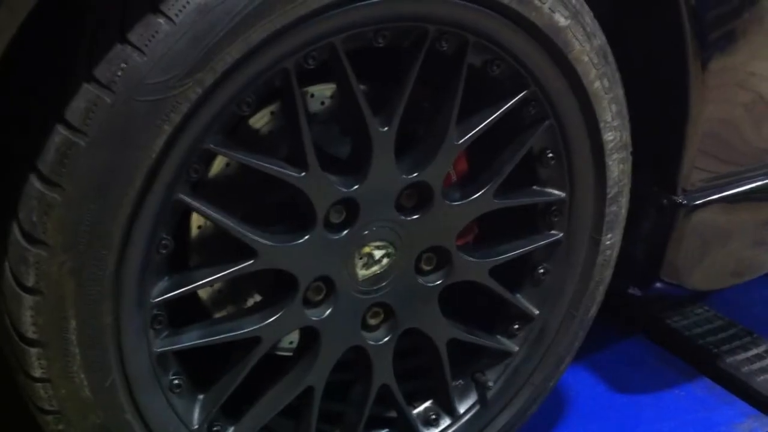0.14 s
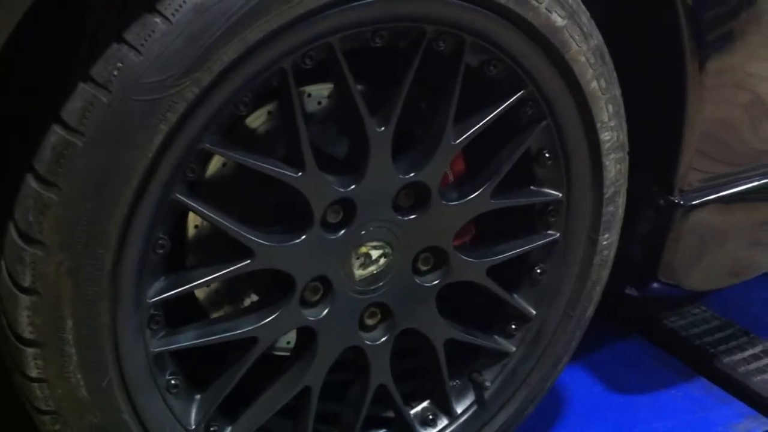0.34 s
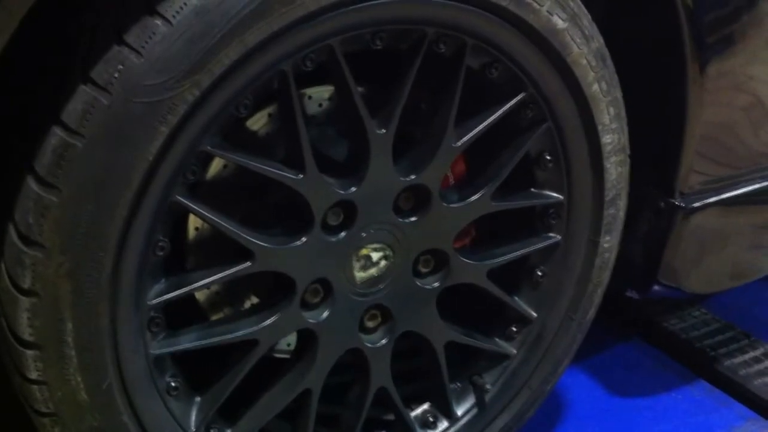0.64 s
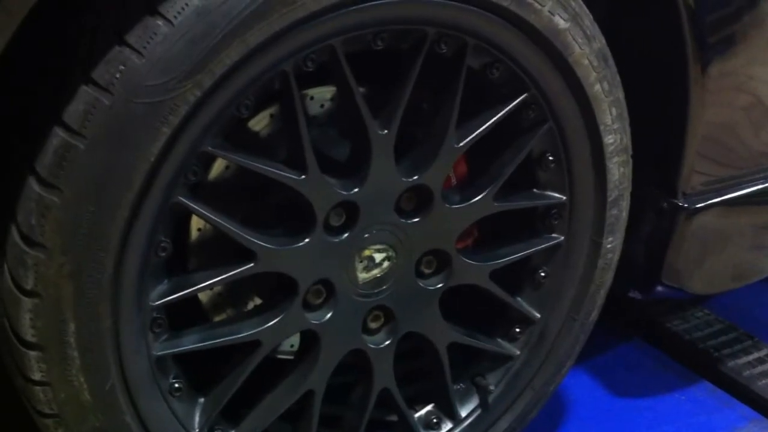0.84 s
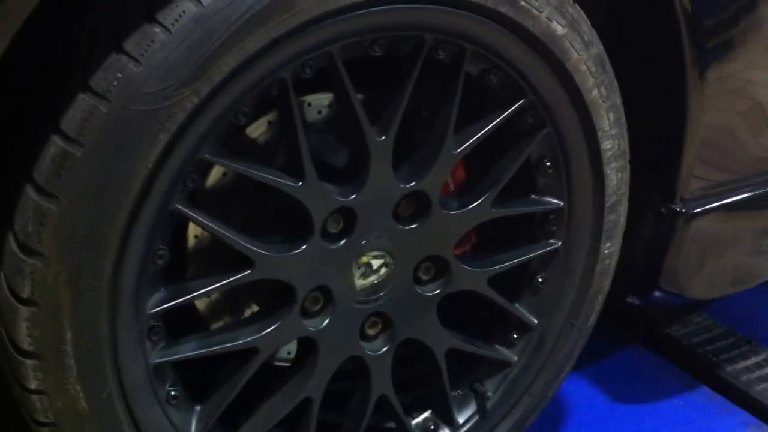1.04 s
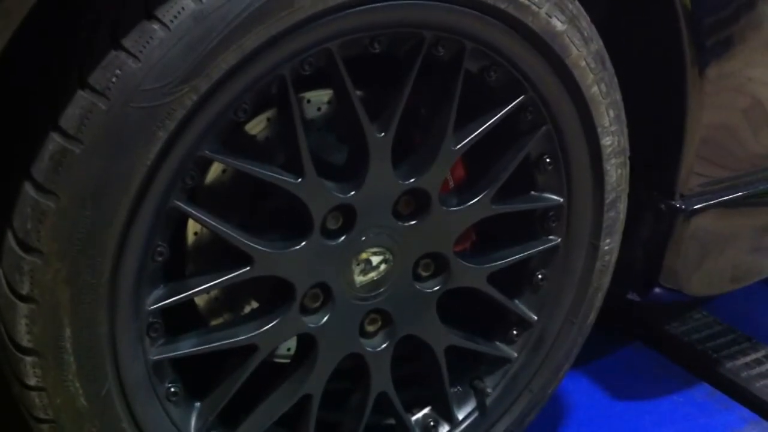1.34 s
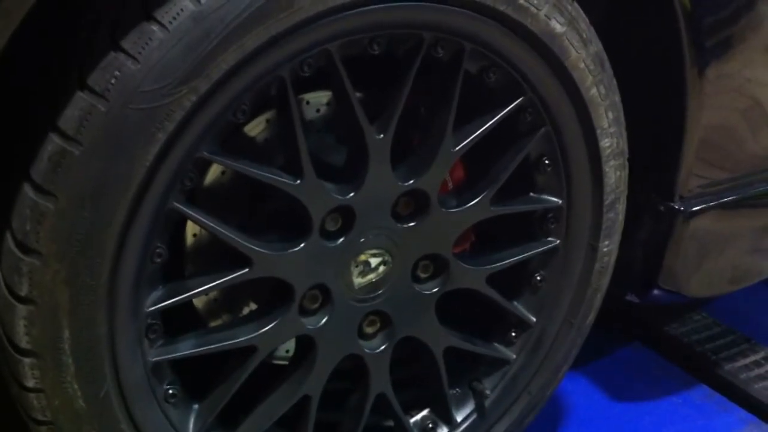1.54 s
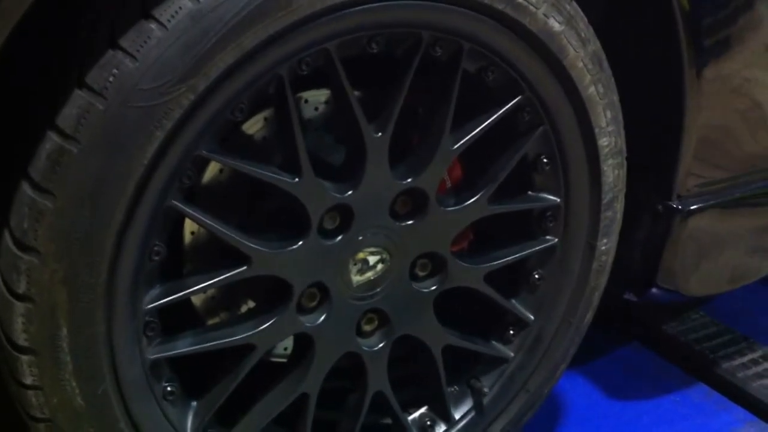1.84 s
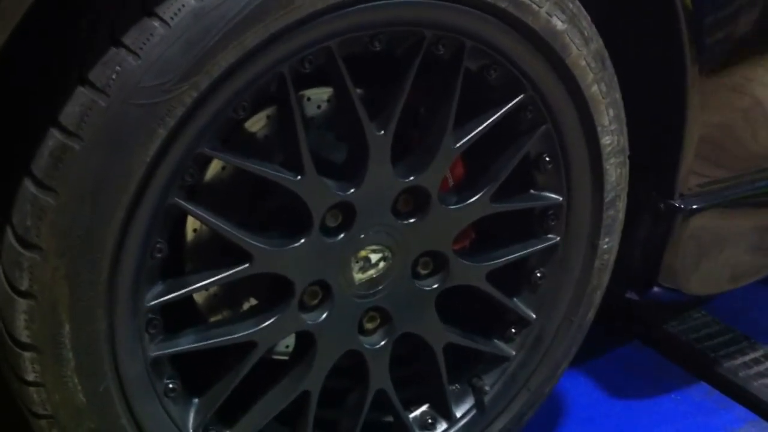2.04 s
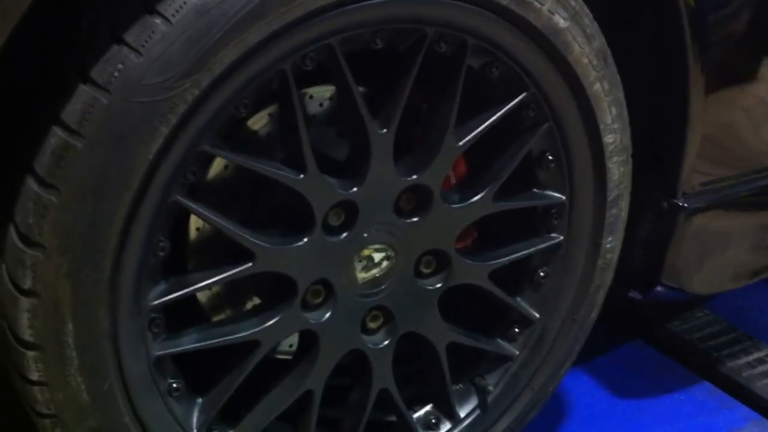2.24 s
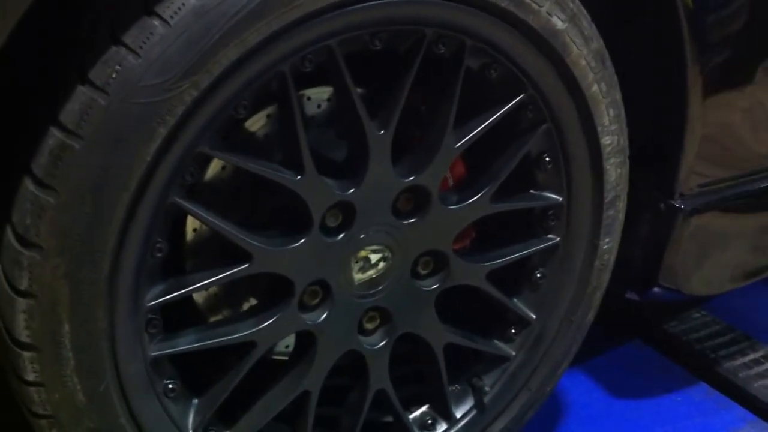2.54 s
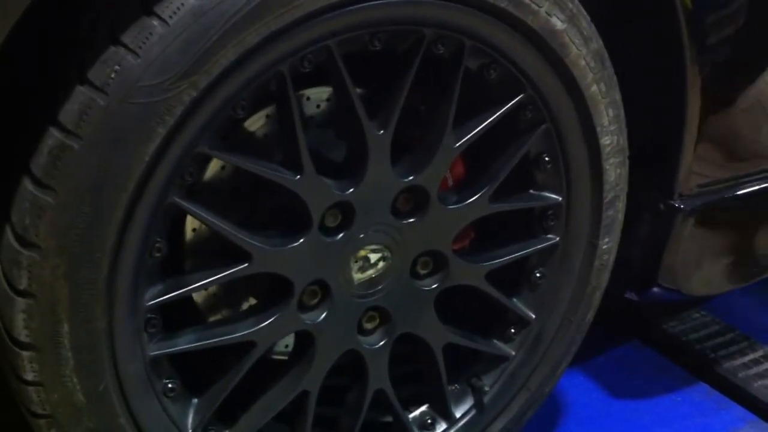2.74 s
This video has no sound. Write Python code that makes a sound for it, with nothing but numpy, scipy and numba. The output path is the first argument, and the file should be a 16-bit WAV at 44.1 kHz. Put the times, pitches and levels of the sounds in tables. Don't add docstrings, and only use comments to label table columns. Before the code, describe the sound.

A car engine idles throughout, heard close in mono in a garage with a short echo. A low, slightly uneven exhaust drone booms beneath bright metallic valve taps, one loud tap recurring between six and seven times a second with weaker ones between. Chain whirr, faint belt whine and fan hiss fill the middle. After 1 s the boom surges and the idle quickens slightly; near 2.3 s something loose rattles once.

```python
import sys
import numpy as np
from scipy import signal
from scipy.io import wavfile
from scipy.ndimage import uniform_filter1d
from numba import njit

SR = 44100
rng = np.random.default_rng(int(sys.argv[2]) if len(sys.argv) > 2 else 0)


def wav_record(signal):
    frames = np.transpose(np.atleast_2d(signal))
    bounded = np.clip(frames, -1, 1)
    quanta = np.round(bounded * 32767).astype(np.int16)
    wavfile.write(sys.argv[1], SR, quanta)


def gain_from_db(level_db):
    decades = np.asarray(level_db, float) / 20
    return 10 ** decades


N = 127008


def level(x, db):
    return x * gain_from_db(db) / np.sqrt(np.mean(x ** 2))


def noise():
    return rng.standard_normal(N)


@njit
def svf(x, hz, width):
    y, band, low = np.empty(len(x)), 0., 0.
    g, damping = np.tan(np.pi * hz / SR), width / hz
    for i in range(len(x)):
        v = (band + g * (x[i] - low)) / (1 + g * (g + damping))
        band, low, y[i] = 2 * v - band, low + 2 * g * v, damping * v
    return y


def ring(x, modes):
    out = 0
    for k, (hz, width, db) in enumerate(modes):
        out = out + (-1) ** k * gain_from_db(db) * svf(x, 1. * hz, 1. * width)
    return out


def walk(rate):
    hold = int(SR / rate)
    steps = np.repeat(rng.standard_normal(N // hold + 1), hold)
    return 1.85 * uniform_filter1d(uniform_filter1d(steps, hold), hold)[:N]


def convolve(x, shape):
    return signal.fftconvolve(x, shape)[:N]


def strikes(turns, deg, jitter_deg, scatter_db):
    chance = rng.standard_normal((24, 2))
    at = np.arange(24) - 1 + (deg + jitter_deg * chance[:, 0]) / 720
    keep = (at > 0) & (at < turns[-1])
    out = np.zeros(N)
    out[np.searchsorted(turns, at[keep])] = gain_from_db(scatter_db * chance[keep, 1])
    return out


# time in seconds, crank speed in rpm.
SPEED = [(0.0, 786.2), (0.19, 783.5), (0.38, 778.7), (0.58, 787.6), (0.77, 776.9), (0.96, 795.9),
         (1.15, 783.1), (1.34, 800.2), (1.54, 777.7), (1.73, 812.1), (1.92, 789.3), (2.11, 817.2),
         (2.3, 803.4), (2.5, 801.9), (2.69, 811.4), (2.88, 796.3)]


def crank_rpm():
    speed = np.array(SPEED)
    return np.interp(np.arange(N) / SR, speed[:, 0], speed[:, 1])


CYLINDERS = [-5.5, -1, -6, -1.5, -6.5, 0.5]


def cylinder_firings(turns):
    first_deg, jitter_deg, scatter_db = 18, 1.5, .8
    out = 0
    for k, db in enumerate(CYLINDERS):
        deg = first_deg + 720 * k / len(CYLINDERS)
        out = out + gain_from_db(db) * strikes(turns, deg, jitter_deg, scatter_db)
    return out


# time in seconds, level in dB.
BOOM = [(0.0, -12), (0.02, -11.5), (0.74, -10.5), (0.76, -11.5), (1.07, -8.5), (1.19, -12), (1.26, -8),
        (1.4, -9.5), (1.48, -10), (1.84, -9.5), (1.94, -10), (2.28, -7), (2.35, -10), (2.85, -7),
        (2.88, -8)]
# frequency in Hz, width in Hz, level in dB.
PIPE = [(156.4, 16.5, 1.5), (83.5, 11, -7), (60.5, 8, -12), (280.5, 22.3, -3), (101, 9.6, -4.5),
        (139.8, 10, 2.5), (40, 15, -31), (199, 27, -8), (354, 50, -8), (446, 130, -21.5)]


def exhaust(turns, firings):
    order, lead_deg = 18, 3.6
    t, curve = np.arange(N) / SR, np.array(BOOM)
    boom_db = np.interp(t, curve[:, 0], curve[:, 1]) + 0.29 * walk(9.23)
    boom = np.sqrt(2) * gain_from_db(boom_db) * np.sin(2 * np.pi * order * (turns + lead_deg / 720))
    pipe = level(ring(firings, PIPE), -20)
    rumble = level(svf(noise(), 187.0, 204.0), -24.5)
    return boom + pipe + rumble


# angle in degrees of the 720 cycle, then low, middle, high and top band levels in dB.
TAPS = [(326.6, -24, -26.5, -27, -30), (106, -32.5, -37.5, -34.5, -42), (126.9, -41, -35, -36.5, -30.5),
        (595, -49, -34.5, -33, -27.5), (271.4, -36, -37, -39.5, -39)]
# delay in seconds, level in dB.
BOUNCES = [(.007, -7), (0.018, -8), (.027, -7.5)]
# frequency in Hz, width in Hz.
TAP_BANDS = [(2500, 2130), (5200, 5200), (9800, 5100), (13500, 4600)]
# frequency in Hz, width in Hz, level in dB.
HEAD = [(2145, 340, -6), (2982, 70, 5.5), (3187, 73, -2), (3550, 120, 3.5), (4210, 54, -1), (4496, 90, 2.5),
        (5220, 86, -12.5), (7390, 48, -4), (8460, 130, -11.5), (10710, 83, -4), (3260, 500, -12),
        (10700, 83, -6)]


def tap_envelope(t):
    rise_s, hold_s, decay_s = .001, .012, .008

    def puff(s):
        return (s > 0) * np.exp(-np.maximum(s, 0) / 0.0047)

    shape = np.exp(-np.maximum(t - hold_s, 0) / decay_s) + .5 * puff(t)
    for delay, db in BOUNCES:
        shape = shape + gain_from_db(db) * puff(t - delay)
    return shape * np.minimum(t / rise_s, 1)


def valves(turns):
    jitter_deg, scatter_db, same_share, grain_db = 2, .4, .8, .8
    head_db, head_steady_db = 12.5, -28
    t, out = np.arange(4000) / SR, 0
    shape = tap_envelope(t)
    for deg, *band_db in TAPS:
        hits = strikes(turns, deg, jitter_deg, scatter_db)
        same = convolve(hits, shape * rng.standard_normal(len(t)))
        fresh = convolve(hits, shape) * noise()
        rattle = np.sqrt(same_share) * same + np.sqrt(1 - same_share) * fresh
        rattle = rattle * gain_from_db(grain_db * walk(1500))
        for db, (hz, width) in zip(band_db, TAP_BANDS):
            out = out + gain_from_db(db + 4) * svf(rattle, 1. * hz, 1. * width)
        out = out + gain_from_db(band_db[0] + head_db) * ring(rattle, HEAD)
    return out + gain_from_db(head_steady_db) * ring(noise(), HEAD)


# start in seconds, frequency in Hz, width in Hz, level in dB, decay in seconds.
CHIRPS = [
    (2.291, 4500, 150, -2, .009),
    (2.292, 3500, 160, -4, .016),
    (2.270, 4300, 400, -13, .018),
    (2.305, 5000, 1200, -19, .012),
]


def loose_part():
    t, out = np.arange(N) / SR, 0
    for start, hz, width, db, decay in CHIRPS:
        burst = (t > start) * np.exp(-np.maximum(t - start, 0) / decay) * noise()
        out = out + gain_from_db(db) * svf(burst, 1. * hz, 1. * width)
    return out


# frequency in Hz, width in Hz, level in dB.
CASING = [(921, 43, 5), (985, 54, 7.5), (1108, 22, 3), (1283, 24.6, 9), (1460, 47.5, 9), (1634, 147, 3),
          (2220, 110, -5), (1370, 720, -11)]


def casing(firings):
    knock_s, knock_db, flicker_db = 0.0073, 8.5, .8
    knock = convolve(firings, np.exp(-np.arange(3000) / SR / knock_s))
    whirr = noise() * gain_from_db(flicker_db * walk(25.05))
    return level(ring((1 + gain_from_db(knock_db) * knock) * whirr, CASING), -22.5)


# frequency in Hz at the mean speed, level in dB, waver in dB.
WHINES = [(1113, -35, 2), (985, -36, 2.5)]


def whines():
    follow, wobble = .6, .002
    ratio = uniform_filter1d(crank_rpm() / np.array(SPEED)[:, 1].mean(), size=12000)
    out = 0
    for hz, db, waver_db in WHINES:
        loudness = np.sqrt(2) * gain_from_db(db + waver_db * walk(14))
        pitch = hz * ratio ** follow * (1 + wobble * walk(12))
        out = out + loudness * np.sin(2 * np.pi * np.cumsum(pitch) / SR)
    return out


# frequency in Hz, level in dB per Hz.
AIR = [(240, -33), (400, 0), (749, -7), (972, -3), (1490, -8.5), (2710, -16), (3070, -13), (10900, -19.5),
       (15600, -9)]


def air():
    flicker_db = .8
    out, swell, colour = 0, walk(0.5), np.array(AIR)
    for hz in 420 * 2 ** np.arange(0, 5.3, .4):
        db = np.interp(np.log(hz), np.log(colour[:, 0]), colour[:, 1])
        db = db + .5 * swell + flicker_db * walk(12)
        out = out + gain_from_db(db) * svf(svf(noise(), hz, hz / 1.63), hz, hz / 1.3)
    return level(out, -24.5)


def garage(taps):
    t60_s, room_db = .16, -14
    s = np.arange(int(.4 * SR)) / SR
    tail = rng.standard_normal(len(s)) * np.exp(-np.log(1000) * s / t60_s) * (s > .004)
    tail = tail / np.sqrt(np.sum(tail ** 2))
    return gain_from_db(room_db) * convolve(taps, tail)


def scene():
    turns = np.cumsum(crank_rpm()) / 120 / SR
    firings = cylinder_firings(turns)
    taps = valves(turns) + loose_part()
    engine = exhaust(turns, firings) + taps + casing(firings) + whines()
    return (engine + garage(taps) + air())[None]


def low_pass(x):
    return signal.sosfilt(signal.butter(12, 15700, fs=SR, output="sos"), x)


def record(dry):
    mic_top_hz, cut_hz = 13940, 15750
    drooped = signal.lfilter(*signal.butter(4, mic_top_hz, fs=SR), dry)
    rounded = np.tanh(.75 * drooped) / .75
    cut = signal.sosfilt(signal.ellip(8, .2, 70, cut_hz, fs=SR, output="sos"), rounded)
    return low_pass(cut)


dry = scene()
out = record(dry)
wav_record(out)
```